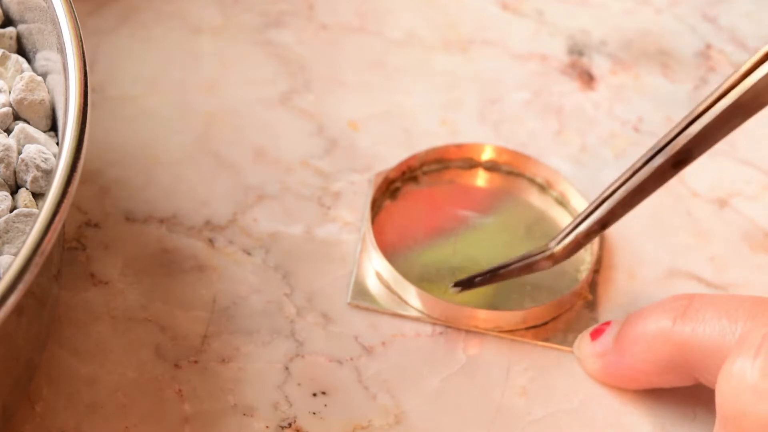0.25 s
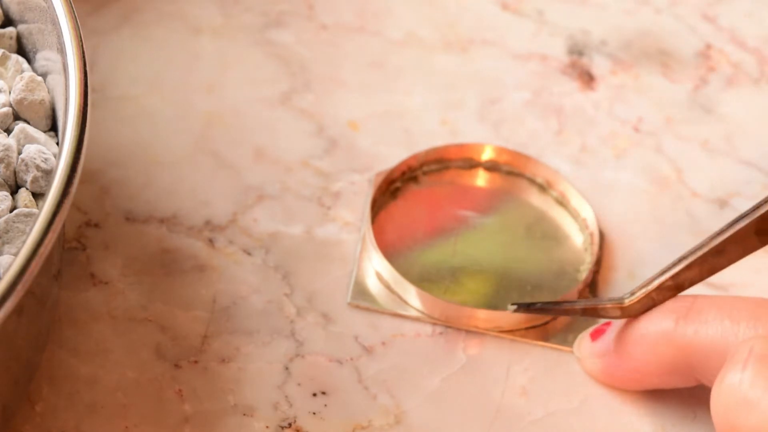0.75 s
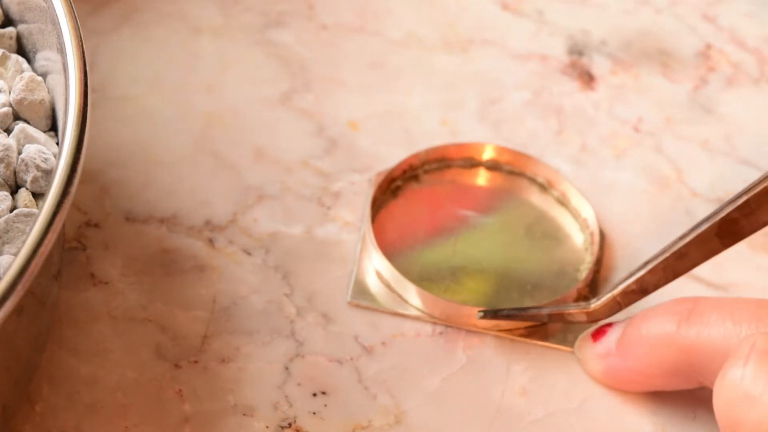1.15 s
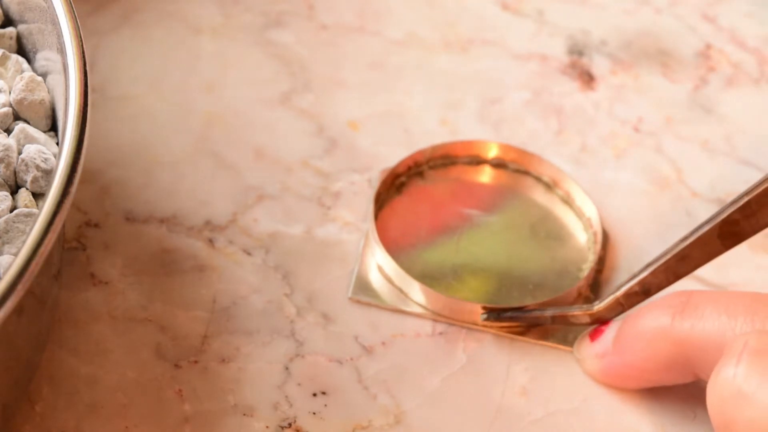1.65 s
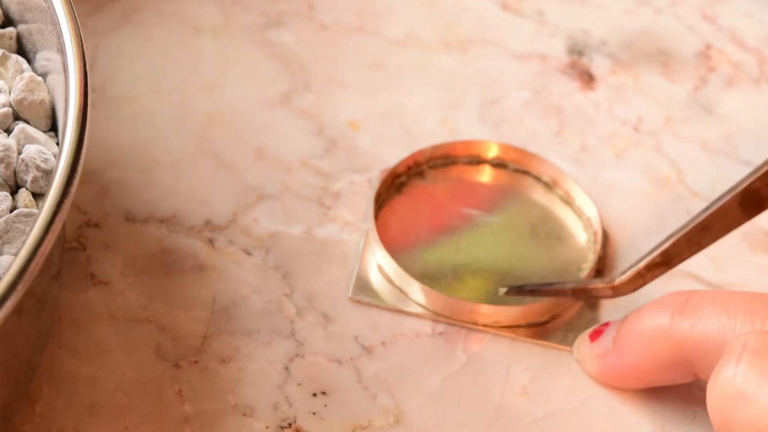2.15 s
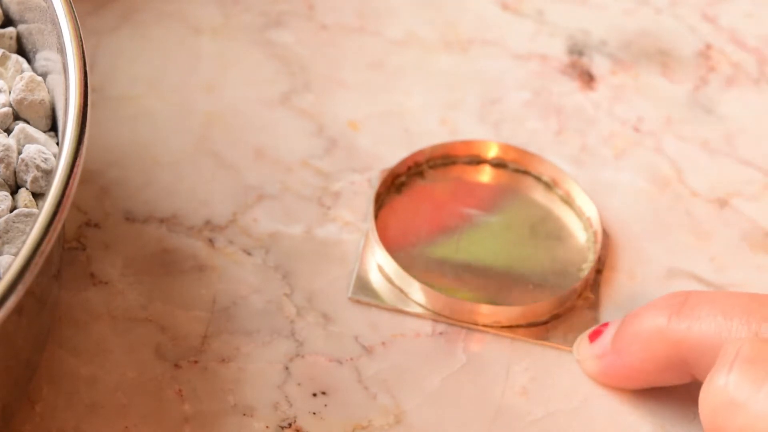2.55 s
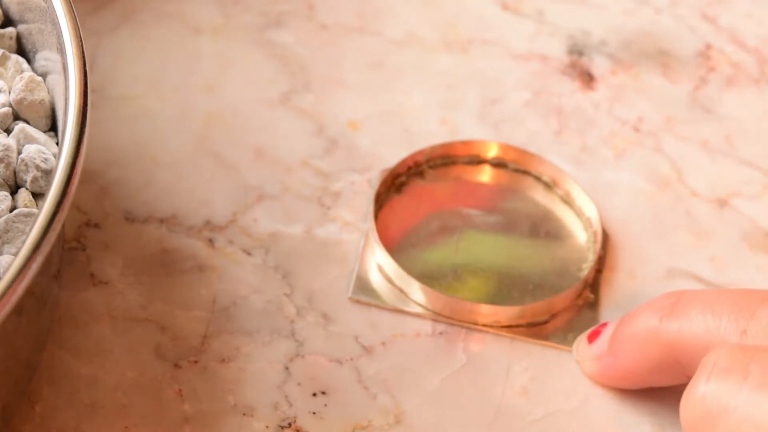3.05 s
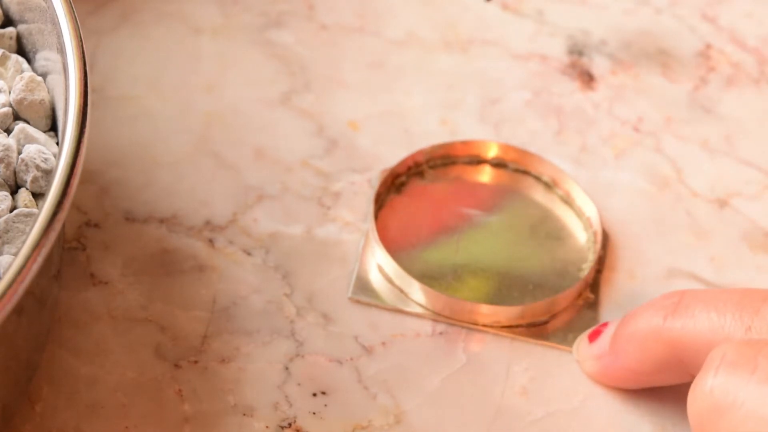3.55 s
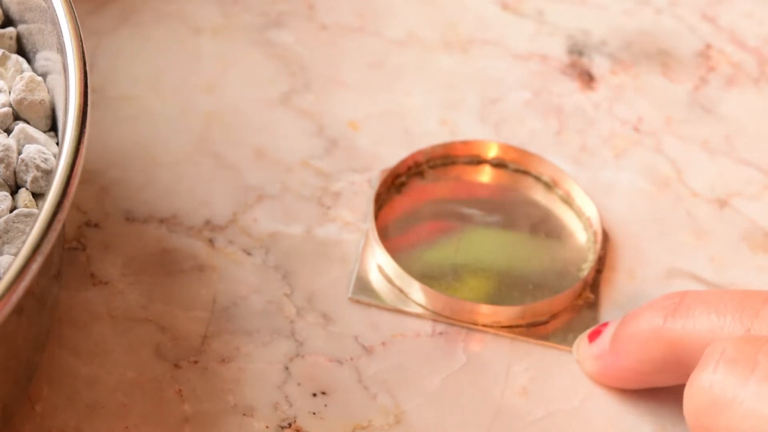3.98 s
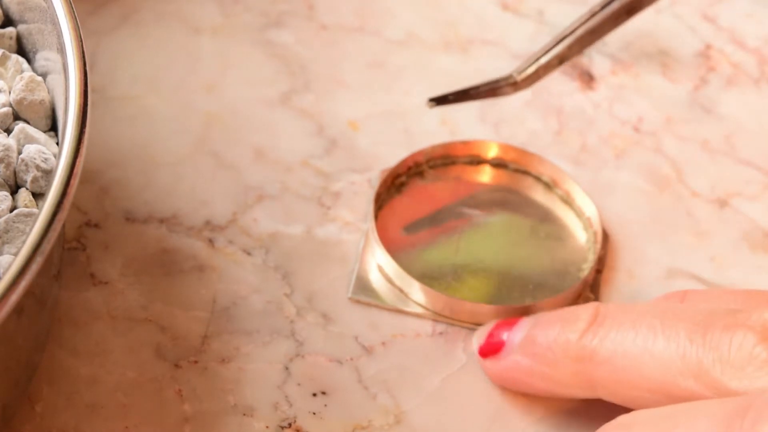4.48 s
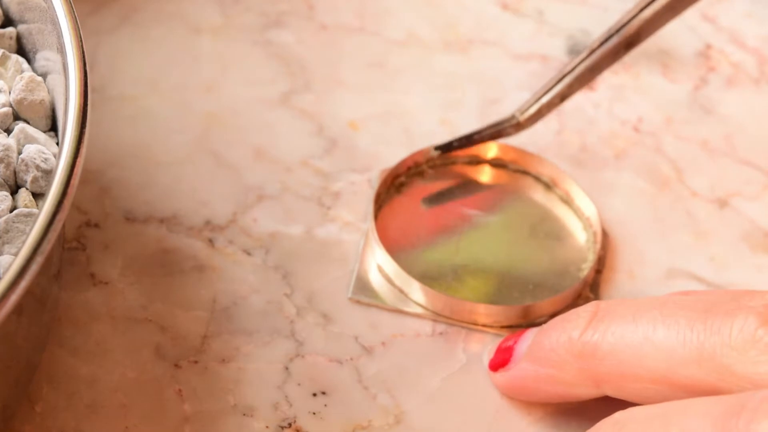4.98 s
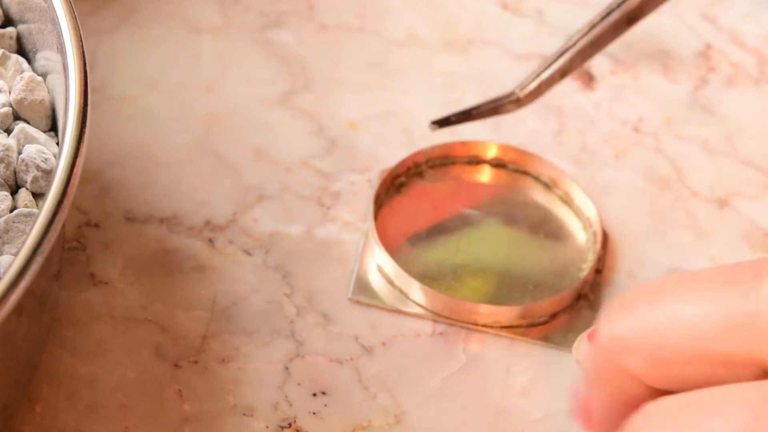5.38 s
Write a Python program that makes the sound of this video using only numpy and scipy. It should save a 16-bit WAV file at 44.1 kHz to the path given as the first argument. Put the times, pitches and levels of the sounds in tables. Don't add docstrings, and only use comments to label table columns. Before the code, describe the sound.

Close to a stone bench in a workshop, steel tweezers touch a small brass dish held by fingers. A light clatter comes first, then one hard loud clack, a longer rattle with a gritty slide, and a few softer taps. Faint rubs and ticks end it, over low steady machine hum.

```python
import sys
import numpy as np
from scipy import signal
from scipy.io import wavfile
from scipy.ndimage import uniform_filter1d

SR = 44100
rng = np.random.default_rng(int(sys.argv[2]) if len(sys.argv) > 2 else 0)


def convert_level_to_amplitude(level_db):
    exponent = np.asarray(level_db, float) / 20
    return 10 ** exponent


def store_wav(level_fs):
    pcm = np.round(np.clip(np.atleast_2d(level_fs), -1, 1) * 32767)
    wavfile.write(sys.argv[1], SR, pcm.T.astype(np.int16))


N = 247838
TAIL = int(0.3 * SR)
BAND_EDGES_HZ = 25 * 2 ** np.arange(0, 9.5, 1 / 3)

# hz, level_db (per Hz)
HUM_SPECTRUM = [(15, -71), (25, -35), (87, -26), (114, -13), (285, -10), (317, 3), (373, -8), (476, -7.5),
                (545, -6), (911, -1.5), (1130, -4.5), (1940, -9.5), (2410, -14.5), (7310, -27.5),
                (16000, -45)]


def at_hz(points, hz):
    points_hz, values = np.transpose(points)
    return np.interp(np.log(hz), np.log(points_hz), values)


def drift(rate_hz):
    pole = np.exp(-80 * np.pi * rate_hz / SR)
    white = rng.standard_normal(N // 40 + 2002)
    slow = signal.lfilter([1], [1, -2 * pole, pole * pole], white)[2000:]
    return np.interp(np.arange(N) / 40, np.arange(len(slow)), slow / slow.std())


def swell(middle_s, length_s):
    phase = np.clip((np.arange(N) / SR - middle_s) / length_s, -0.5, 0.5)
    return np.cos(np.pi * phase) ** 2


def band_pass(order, low_hz, high_hz, x):
    return signal.sosfilt(signal.butter(order, [low_hz, high_hz], "band", fs=SR, output="sos"), x)


def third_octaves():
    for low_hz, high_hz in zip(BAND_EDGES_HZ, BAND_EDGES_HZ[1:]):
        yield np.sqrt(low_hz * high_hz), low_hz, high_hz


def loudest(x):
    return np.abs(x).max(axis=1, keepdims=True)


def add(track, times_s, sounds):
    for time_s, sound in zip(times_s, sounds):
        start = round(time_s * SR)
        track[start:start + len(sound)] += sound[:N - start]
    return track


def coloured_noise(spectrum, patchy_db):
    out = 0
    white = rng.standard_normal((2, N))
    together = drift(24.0)
    for k, (hz, low_hz, high_hz) in enumerate(third_octaves()):
        level_db = at_hz(spectrum, hz) + patchy_db * (together + 3.1 * drift(3.3))
        out = out + convert_level_to_amplitude(level_db) * band_pass(2, low_hz, high_hz, white[k % 2])
    return out / out.std()


def touches():
    # start_s, peak_db, echo_db
    contacts = [(0.3665, -15, -3), (0.374, -18, -0.5), (0.413, -23, -1), (0.424, -17, -3.5),
                (0.437, -15, -8.5), (0.455, -20.5, -11), (0.673, -31.5, -2), (0.8955, 1.5, -10),
                (0.967, -12, -3.5), (0.975, -10.5, -31), (0.999, -29, 0), (1.02, -25.5, 0),
                (1.061, -20, -8.5), (1.096, -24.5, 0), (1.103, -30, 6.5), (2.208, -22.5, -3.5),
                (2.255, -18, -5), (2.261, -28, -12), (2.2835, -4.5, -4), (2.291, -10, -5), (2.297, -14, -9),
                (2.31, -13.5, -1), (2.321, -11, -10), (2.344, -18.5, -9), (2.369, -19.5, -6),
                (2.377, -29.5, 4.5), (2.402, -16, -5.5), (2.41, -11.5, -5.5), (2.458, -22.5, -2.5),
                (2.489, -33, -22),
                (2.859, -15, -5), (2.863, -23, -2), (2.872, -37, -15), (2.948, -20, -6), (2.963, -24.5, -23),
            (2.976, -43, -10), (3.598, -17.5, -4), (3.601, -34, -25), (3.62, -19, -13), (4.135, -41, -2),
            (4.684, -29.5, -1.5), (4.697, -23.5, -7.5), (4.712, -29.5, -8), (4.769, -44, 4)]
    # first_touch_s, treble_db, steel_ping_db, decay_percent
    grips = [(0.36, -30, -11.5, 142), (0.41, -35, -13, 88), (0.66, -22, -12, 104), (0.88, -28, -14.5, 109),
             (0.96, -27, -12.5, 106), (1.089, -69, -12.5, 88), (2.2, -31, -11, 54),
             (2.275, -34, -13.5, 106), (2.395, -55, -14, 137), (2.85, -64, -11.5, 53), (2.94, -59, -20, 88),
             (3.59, -52, -22, 61), (4.12, -31, -5, 72), (4.67, -42, -15, 94)]
    start_s, peak_db, echo_db = np.transpose(contacts)
    grips = np.array(grips)
    gesture = np.searchsorted(grips[:, 0], start_s + 0.01) - 1
    first_s, treble_db, ping_db, decay_percent = grips[gesture].T
    treble_db = treble_db - 80 * (start_s - first_s)
    return np.array([start_s, peak_db, treble_db, ping_db, decay_percent, echo_db])


def touch_colour_db(hz, treble_db, ping_db):
    treble_from_hz, ping_hz, ping_octaves = 4140, 2900, 0.6
    fall = (treble_db + 42.5) * max(np.log2(hz / treble_from_hz), 0)
    ping = (ping_db + 12.5) * np.exp(-(np.log2(hz / ping_hz) / ping_octaves) ** 2)
    return fall + ping


def damped_ring(t, treble_db, ping_db, decay):
    # mode_hz, level_db, t60_s
    body = [(333, -4, 0.06), (460, -6.5, 0.21), (600, -4.5, 0.22), (666, -5, 0.14), (743, -1.5, 0.19),
            (857, 0.5, 0.088), (940.4, 3.5, 0.084), (1188, -4, 0.11), (1396, -2.5, 0.063),
            (1603, -7.5, 0.079), (1800, -8, 0.094), (2236, -10.5, 0.11), (2736, -3.5, 0.034),
            (3207, -12, 0.045)]
    spread_db, detune = 2.2, 0.015
    contact_s = 0.00038
    snap, snap_s = 3.2, 0.0015
    luck, shift = rng.standard_normal((2, len(decay), len(body)))
    ring = 0
    for k, (hz, level_db, t60_s) in enumerate(body):
        strength_db = level_db + touch_colour_db(hz, treble_db, ping_db) + spread_db * luck[:, k:k + 1]
        mode_hz = hz * (1 + detune * shift[:, k:k + 1])
        ring = ring + convert_level_to_amplitude(strength_db - 60 * t / (t60_s * decay)) * np.sin(2 * np.pi * mode_hz * t)
    ring = ring * (1 + snap * np.exp(-t / snap_s)) * (1 - np.exp(-t / contact_s))
    ring = band_pass(3, 430, 4800, ring)
    return ring / loudest(ring)


def echo_arrivals(t, count):
    lump_s, lumpy_db = 0.0008, 4.5
    first_echo_s, early, early_s = 0.00052, 0.64, 0.0078
    white = rng.standard_normal((count, 3, TAIL))
    lumps = uniform_filter1d(white[:, 2], size=max(round(lump_s * SR), 1), axis=1)
    onset = (1 - np.exp(-t / first_echo_s)) * (1 + early * np.exp(-t / early_s))
    return white[:, :2] * (convert_level_to_amplitude(lumpy_db * lumps / lumps.std()) * onset)[:, None]


def scattered_echoes(t, arrivals, treble_db, ping_db, decay):
    # hz, level_db (per Hz)
    echo_colour = [(120, -61), (200, -45), (424, -4.5), (749, -12), (821, -6), (950, -3), (1060, -3),
                   (1140, -2.5), (2800, -12), (8420, -41.5), (16000, -83)]
    # hz, t60_s
    echo_t60 = [(250, 0.083), (600, 0.082), (1400, 0.26), (3700, 0.19), (10000, 0.14)]
    scatter = 0
    for k, (hz, low_hz, high_hz) in enumerate(third_octaves()):
        if hz > 180:
            fall_db = -60 * t / (at_hz(echo_t60, hz) * decay)
            level_db = at_hz(echo_colour, hz) + touch_colour_db(hz, treble_db, ping_db)
            dying = arrivals[:, k % 2] * convert_level_to_amplitude(fall_db)
            scatter = scatter + convert_level_to_amplitude(level_db) * band_pass(2, low_hz, high_hz, dying)
    return scatter / loudest(scatter)


def knocks():
    start_s, peak_db, treble_db, ping_db, decay_percent, echo_db = touches()[:, :, None]
    t = np.arange(TAIL) / SR
    decay = np.clip(decay_percent / 100, 0.2, 3)
    ring = damped_ring(t, treble_db, ping_db, decay)
    arrivals = echo_arrivals(t, len(start_s))
    scatter = scattered_echoes(t, arrivals, treble_db, ping_db, decay)
    returns = arrivals[:, 0] * convert_level_to_amplitude(-29.5 + echo_db - 60 * t / (0.35 * decay))
    ring_echoes = signal.fftconvolve(ring, returns, axes=1)[:, :TAIL]
    sounds = ring + ring_echoes + convert_level_to_amplitude(echo_db) * scatter
    sounds = convert_level_to_amplitude(peak_db - 3.5) * sounds * (1 - (t / t[-1]) ** 2)
    track = add(np.zeros(N), start_s[:, 0] + 0.00126, sounds)
    return signal.sosfilt(signal.butter(4, 300, "high", fs=SR, output="sos"), track)


def ticks():
    # start_s, peak_db, low_hz, high_hz, t60_s
    bursts = [(0.102, -52, 6000, 15000, .03), (0.68, -34, 3300, 4800, 0.013),
              (0.68, -37, 2000, 4250, 0.087), (3.822, -55, 6000, 14000, .08),
              (4.9338, -43, 4000, 15500, 0.021), (5.1998, -37.5, 3500, 14500, 0.019),
              (0.897, -20, 2250, 3640, 0.31), (4.135, -48, 1500, 4200, .06),
              (0.97, -25.5, 2400, 5040, 0.21), (2.253, -40, 600, 3200, 0.043),
              (2.296, -21.5, 1700, 4230, 0.23), (2.8596, -21.5, 1600, 3600, 0.017),
              (2.9478, -33.5, 1400, 3300, 0.02), (3.5985, -34, 1400, 4100, 0.016),
              (0.37, -22.5, 300, 560, 0.79), (2.86, -32.5, 230, 460, 0.082), (2.95, -39, 234, 457, 0.36),
              (0.9005, -7, 525, 1020, 0.15), (1.0975, -27.5, 840, 2340, 0.18),
              (2.41, -30.5, 2000, 4200, 0.24), (0.375, -29.5, 1700, 5500, 0.087),
              (4.698, -35, 520, 1000, .12)]
    t = np.arange(TAIL // 2) / SR
    sounds = []
    for start_s, peak_db, low_hz, high_hz, t60_s in bursts:
        burst = rng.standard_normal(len(t)) * convert_level_to_amplitude(-60 * t / t60_s)
        sound = band_pass(4, low_hz, high_hz, burst)
        sounds.append(convert_level_to_amplitude(peak_db) * sound / np.abs(sound).max() * (1 - t / t[-1]))
    return add(np.zeros(N), np.array(bursts)[:, 0], sounds)


def slide():
    # middle_s, length_s, level_db
    plate_slide = (2.352, 0.4, -40.5)
    middle_s, length_s, level_db = plate_slide
    return convert_level_to_amplitude(level_db) * swell(middle_s, length_s) * coloured_noise(HUM_SPECTRUM, patchy_db=0.5)


def rubs():
    # low_hz, high_hz
    rub_bands = [(350, 1180), (2300, 3540)]
    # middle_s, length_s, dull_db, bright_db
    hand_shifts = [(0.005, 0.06, -40.5, -72), (0.082, 0.12, -38.5, -66), (0.2, 0.27, -41, -69),
                   (0.348, 0.065, -42, -58), (4.137, 0.069, -42, -49.5), (4.537, 0.076, -43, -72),
                   (4.608, 0.18, -48, -49), (4.69, 0.087, -42, -53), (4.766, 0.18, -43, -67),
                   (4.94, 0.056, -45.5, -55)]
    out = 0
    for column, (low_hz, high_hz) in enumerate(rub_bands):
        noise = band_pass(2, low_hz, high_hz, rng.standard_normal(N))
        level = 0
        for middle_s, length_s, *levels_db in hand_shifts:
            level = level + convert_level_to_amplitude(levels_db[column]) * swell(middle_s, length_s)
        out = out + level * convert_level_to_amplitude(2.4 * drift(100) - 7.0) * noise / noise.std()
    return out


def squeaks():
    # start_s, end_s, pitch_hz, level_db
    whistles = [(3.67, 3.715, 8740, -72), (3.725, 3.763, 8800, -75), (3.808, 3.84, 7140, -64),
                (3.818, 3.845, 8840, -71)]
    t, wobble = np.arange(N) / SR, drift(150)
    out = 0
    for start_s, end_s, pitch_hz, level_db in whistles:
        arch = np.sin(np.pi * np.clip((t - start_s) / (end_s - start_s), 0, 1)) ** 0.5
        out = out + convert_level_to_amplitude(level_db + 1.0 + 5.0 * wobble) * arch * np.sin(2 * np.pi * pitch_hz * t)
    return out


def workshop_hum():
    # time_s, level_db
    hum_level = [(0.0, -49.5), (1.1, -50), (2.2, -51), (3.1, -49.5), (4.55, -49), (5.62, -49)]
    level_db = np.interp(np.arange(N) / SR, *np.transpose(hum_level))
    return convert_level_to_amplitude(level_db) * coloured_noise(HUM_SPECTRUM, patchy_db=0.35)


def scene():
    return (knocks() + ticks() + slide() + rubs() + squeaks() + workshop_hum())[None]


def treble_dropouts(x):
    # middle_s, lowest_lost_hz
    dropouts = [(0.079, 3240), (1.166, 3800), (2.364, 3800), (2.404, 4650), (3.001, 3750), (4.153, 3730),
                (4.581, 4518), (5.134, 4800)]
    length_s = 0.046
    t, out = np.arange(N) / SR, x.copy()
    for middle_s, low_hz in dropouts:
        treble = signal.sosfiltfilt(signal.butter(8, low_hz, "high", fs=SR, output="sos"), x)
        kept = np.abs(np.sin(np.pi * np.clip((t - middle_s) / length_s, -0.5, 0.5)))
        out -= treble * (1 - kept)
    return out


def roll_off(x):
    return signal.sosfilt(signal.butter(12, 16310, fs=SR, output="sos"), x)


def record(dry):
    out = np.clip(treble_dropouts(dry), -0.99, 0.99)
    out = signal.sosfilt(signal.cheby2(12, 60, 16400, fs=SR, output="sos"), out)
    return roll_off(out)


dry = scene()
out = record(dry)
store_wav(out)
```